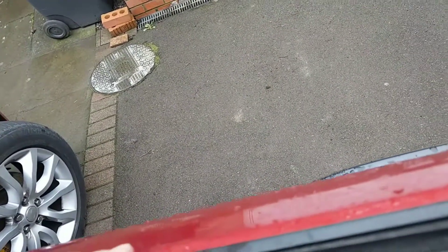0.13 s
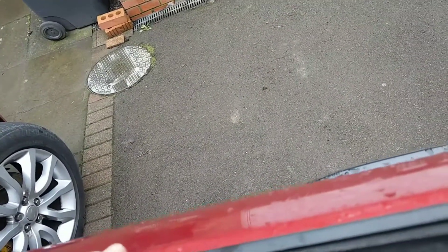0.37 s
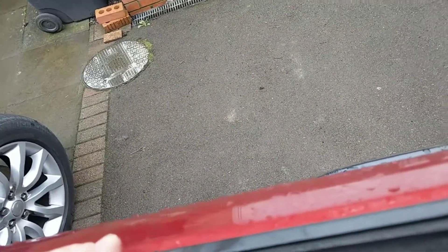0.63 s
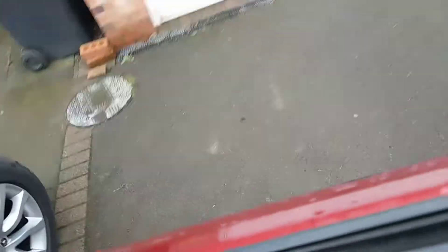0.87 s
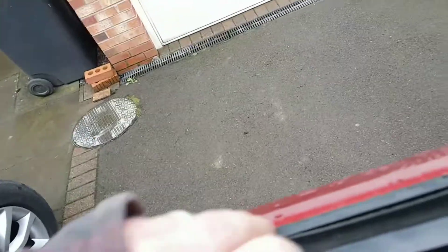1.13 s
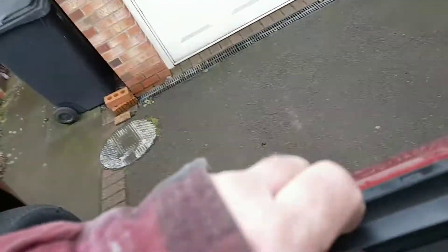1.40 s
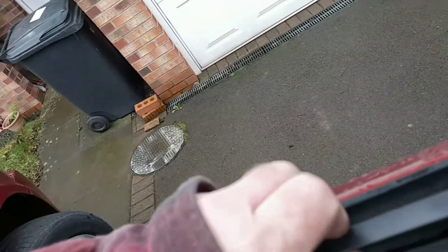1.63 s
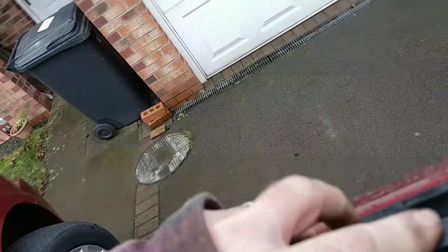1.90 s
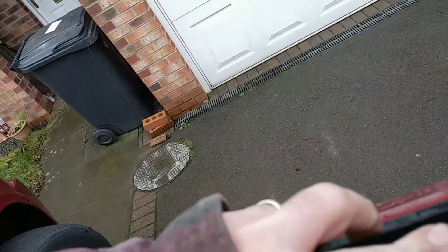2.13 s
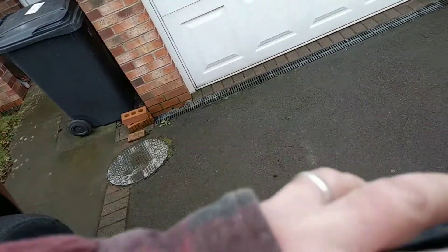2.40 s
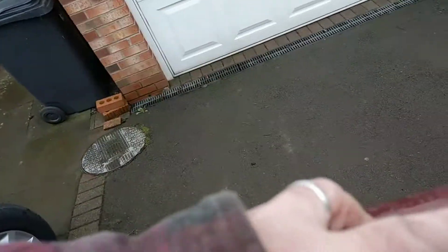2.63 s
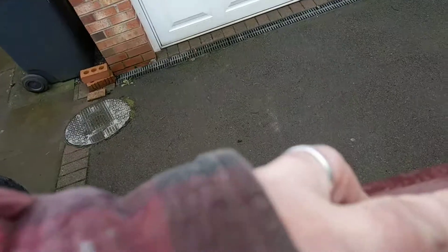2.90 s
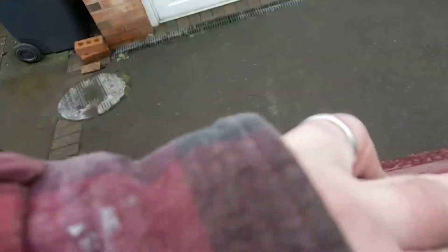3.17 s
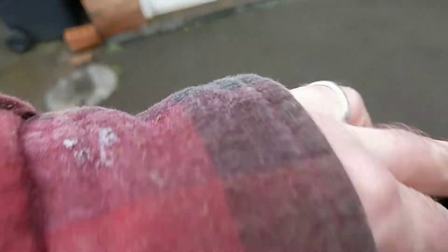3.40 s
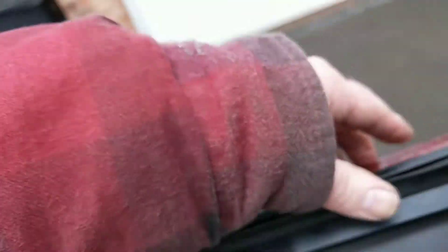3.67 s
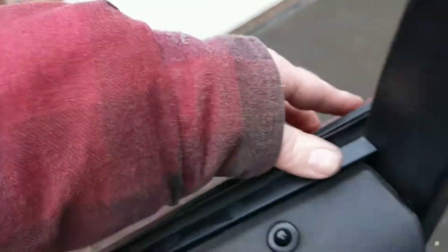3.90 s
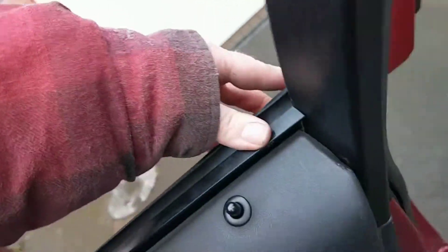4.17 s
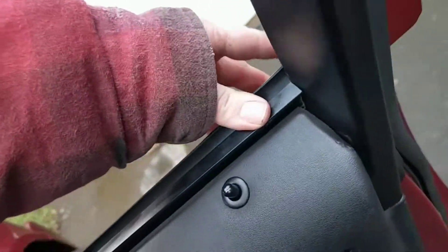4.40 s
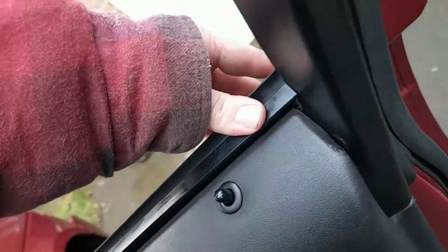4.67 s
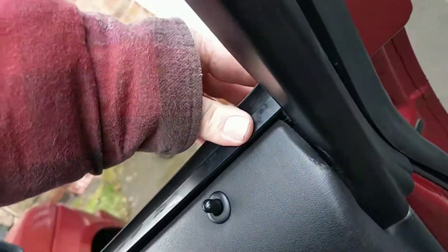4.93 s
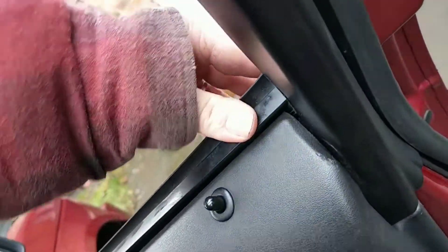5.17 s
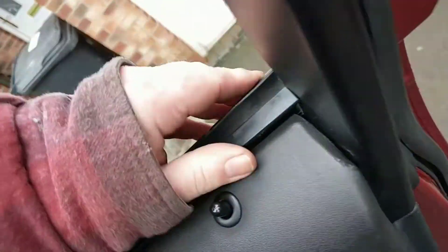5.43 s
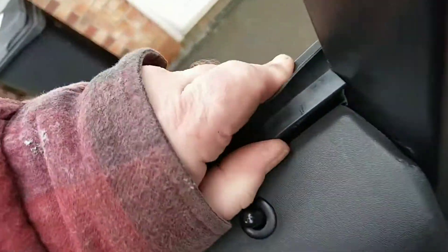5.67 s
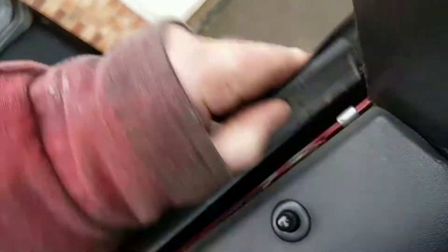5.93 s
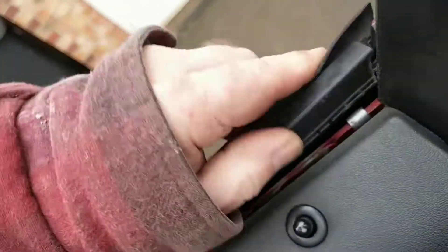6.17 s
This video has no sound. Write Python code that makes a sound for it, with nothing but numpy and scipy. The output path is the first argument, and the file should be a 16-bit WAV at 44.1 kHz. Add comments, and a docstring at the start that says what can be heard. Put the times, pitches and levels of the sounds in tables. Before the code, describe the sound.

Hands fumble at a car door trim in breezy open air, ticking and rubbing faintly until the strip snaps loose with a loud crack and scrape.

```python
"""Trim strip prised off a car door

Hands prise a plastic strip off a door on an open driveway, close to a two-port microphone.
Clips tick (filtered noise bursts) and thump the door (pushed resonances); hand and sleeve rub (shaped noise).
Low bursts of wind and door rumble (noise) reach the ports over steady hiss, an open-air wash, hum and whistle.
At last the strip snaps free: a burst of cracks, a ringing door cavity (decaying sines), a scrape."""
import sys
import numpy as np
from scipy import signal
from scipy.io import wavfile
from scipy.ndimage import uniform_filter1d

SR = 44100
rng = np.random.default_rng(int(sys.argv[2]) if len(sys.argv) > 2 else 0)


def attenuation_scalar(level_db):
    """Turn a level in dB into a linear amplitude multiplier (20 dB per decade)."""
    decades = np.asarray(level_db, float) / 20
    return 10 ** decades


def dump(signal):
    """Clip the signal to [-1, 1] and save it as 16-bit WAV at the path in sys.argv[1]."""
    limited = np.clip(np.atleast_2d(signal).T, -1, 1)
    pcm = np.round(limited * 32767).astype(np.int16)
    wavfile.write(sys.argv[1], SR, pcm)


N = 277995
MAX_PORT_LAG_SAMPLES = 17


def read(points, hz):
    """Value of a table on a log-frequency axis."""
    f, value = np.transpose(points)
    return np.interp(np.log(hz + 1), np.log(f + 1), value)


def sides(pan_db):
    """Left and right gains of constant total power."""
    gains = attenuation_scalar(np.multiply.outer([0.5, -0.5], pan_db))
    return gains * np.sqrt(2 / (gains ** 2).sum(0))


def add(mix, s, sound):
    """Mixes a stereo sound in at time s."""
    part = mix[:, round(s * SR):][:, :sound.shape[1]]
    part += sound[:, :part.shape[1]]


def swell(t, centre_s, half_s):
    """Bell-shaped rise and fall."""
    return np.exp(-((t - centre_s) / half_s) ** 2)


def wander(size):
    """Random drift of standard deviation 1, smoothed twice over size samples."""
    x = uniform_filter1d(rng.standard_normal(N), size=size)
    x = uniform_filter1d(x, size=size)
    return x / x.std()


def noise(colour_db, same, band_hz, patchy_db, size):
    """Two-channel noise: colour_db(hz, t) sets the spectrum, scaled to rms 1 in band; same(hz) the likeness."""
    hop = size // 4
    frames = N // hop + 5
    hz = np.fft.rfftfreq(size, 1 / SR)[:, None]
    a, b, c, d, patches = rng.standard_normal((frames, len(hz), 5)).T
    patches = uniform_filter1d(patches, size=size // 64, axis=0)
    patches = uniform_filter1d(patches, size=8, axis=1)
    shape = attenuation_scalar(colour_db(hz, np.arange(frames) * hop / SR) + np.zeros(frames))
    in_band = (hz > band_hz[0]) & (hz < band_hz[1])
    shape = shape / np.sqrt((shape ** 2 * in_band).sum(0))
    shape = shape * attenuation_scalar(patchy_db * patches / patches.std())
    likeness = np.clip(same(hz), -1, 1)
    left = a + 1j * b
    right = likeness * left + np.sqrt(1 - likeness ** 2) * (c + 1j * d)
    z = np.array([left, right]) * shape
    return signal.istft(z, nperseg=size, noverlap=size - hop)[1][:, :N] * np.sqrt(3 / 2)


def causal(points, size=1024):
    """Minimum-phase impulse response of a spectrum."""
    log_gain = np.log(attenuation_scalar(read(points, abs(np.fft.fftfreq(size, 1 / SR)))))
    return np.fft.ifft(np.exp(np.conj(signal.hilbert(log_gain)))).real[:size // 2]


def body(modes, t, spot_hz, reach_db):
    """Damped resonances; each loses reach_db per octave from the pitch of the struck spot."""
    hz, width_hz, db = np.transpose(modes)[:, :, None]
    db = db - reach_db * abs(np.log2(hz / spot_hz))
    return (attenuation_scalar(db) * np.exp(-np.pi * width_hz * t) * np.sin(2 * np.pi * hz * t)).sum(0)


# clip ticks and cracks: (t/s, treble level/dB, strip level/dB, rattle t60/s, left-right/dB)
CLIP_TICKS = [(0.0231, -44, -59, 0.049, -1.5), (.4355, -41.5, -57, 0.014, 5.5), (0.561, -47, -61, 0.029, 4),
              (0.8192, -52, -64, 0.013, -1), (0.8744, -39.5, -59, 0.011, 1.5),
              (0.8901, -35.5, -52.5, .011, 3.5), (1.393, -33, -60.5, 0.019, -2),
              (1.5944, -40, -52, 0.024, -3.5), (1.804, -40, -58, 0.018, 2.5),
              (1.935, -47.5, -70, 0.018, 11), (1.9595, -38.5, -52, 0.0092, -3),
              (2.1516, -59, -62.5, .015, 7), (2.4032, -41, -57, 0.031, -5),
              (2.527, -29, -37.5, 0.017, -8.5), (2.5346, -37, -69, 0.017, -6.5),
              (2.551, -47, -49.5, 0.01, -6.5), (2.6505, -74, -43, 0.031, -4),
              (2.903, -40.5, -64, 0.018, -5), (2.9751, -49, -69, 0.034, 1.5),
              (3.138, -37, -43.5, 0.044, -7), (3.177, -41.5, -58.5, 0.017, 3),
              (3.5394, -33.5, -50.5, 0.018, -13), (3.5661, -62, -39, 0.011, -12),
              (3.5768, -45.5, -53.5, 0.026, 8), (3.7638, -44.5, -60.5, 0.024, 3.5),
              (3.891, -49, -70, 0.03, -.5), (3.993, -50.5, -68, 0.03, 7), (5.5888, -45, -53, 0.063, 1),
              (5.8898, -38.5, -64, 0.014, 3), (5.974, -23, -33.5, 0.068, -1),
              (5.9831, -43, -26.5, 0.029, 3.5), (5.9862, -12.5, -22.5, 0.032, -4),
              (5.9921, -11, -61, 0.016, 5.5), (5.9954, -18, -26.5, 0.058, 4),
              (6.0045, -22.5, -58, 0.07, -1.5), (6.0266, -33, -46.5, .018, 5), (6.0806, -37, -49, 0.02, 7),
              (6.0924, -35, -48, 0.021, 7), (6.125, -19, -37, 0.011, -0.5),
              (6.1302, -27.5, -34.5, 0.05, 4.5), (6.1361, -34, -44, .029, -8),
              (6.1597, -34.5, -54, .03, -2.5)]
# treble spectrum of a tick: (f/Hz, relative level/dB)
TICK_TREBLE = [(1200, -31), (2400, 0), (3600, 1.5), (5000, 1.5), (6400, 0), (7300, 4), (8300, -6),
               (9200, -11), (10200, -25.5), (13000, -24.5), (15500, -32), (17000, -48)]
# plastic strip resonances: (f/Hz, width/Hz, relative level/dB)
STRIP_MODES = [(750, 210, 25), (1420, 580, 14), (1850, 720, 31), (2740, 500, 26.5), (4470, 490, 9.5)]
# ticks whose treble stands out by more than BRIGHT_DB strike a higher spot of the strip
SPOT_HZ, SPOT_OCT_PER_DB, BRIGHT_DB = 1840, 0.9, 14.5


def ticks():
    """Each tick is a sharp slip with a rattling tail that excites treble and strip."""
    out = np.zeros((2, N))
    t = np.arange(4000) / SR
    crack = causal(TICK_TREBLE)
    # a thin strip radiates no bass, soft contact no top treble
    soft = signal.butter(2, (650, 7000), "band", fs=SR, output="sos")
    for s, treble_db, strip_db, t60_s, pan_db in CLIP_TICKS:
        spot_hz = SPOT_HZ * 2 ** (SPOT_OCT_PER_DB * max(treble_db - strip_db - BRIGHT_DB, 0))
        rattle = rng.standard_normal((3, len(t))) * attenuation_scalar(-60 * t / max(t60_s, 0.004))
        rattle *= np.minimum(t / 0.00071, 1)
        rattle = 0.7 * rattle[0] + 0.7 * rattle[1:]  # ports hear partly different reflections
        rattle[:, 0] -= 5.5  # the slip
        treble = signal.fftconvolve(rattle, crack[None])[:, :len(t)]
        treble = treble / np.sqrt(2 * uniform_filter1d((treble ** 2).mean(0), size=40).max())
        strip = signal.fftconvolve(rattle, body(STRIP_MODES, t, spot_hz, reach_db=6)[None])[:, :len(t)]
        strip = signal.sosfilt(soft, strip)
        strip /= strip[:, :SR // 60].std()
        sound = (attenuation_scalar(treble_db) * treble + attenuation_scalar(strip_db) * strip) * sides(pan_db)[:, None]
        # the shaded port hears it later
        late = round(np.clip(-2 * pan_db, -MAX_PORT_LAG_SAMPLES, MAX_PORT_LAG_SAMPLES))
        sound[0] = np.roll(sound[0], max(late, 0))
        sound[1] = np.roll(sound[1], max(-late, 0))
        add(out, s, sound)
    return out


def yard(x):
    """Short sparse echoes off the door, the ground and the nearby walls: random signed taps, t60 0.23 s."""
    taps = np.zeros((2, 8000))
    at = np.arange(100, 7960, 20) + rng.integers(0, 20, (2, 393))
    np.put_along_axis(taps, at, rng.choice([-1., 1.], at.shape), 1)
    taps *= attenuation_scalar(-60 * np.arange(8000) / SR / 0.23)
    return signal.fftconvolve(x, taps / np.linalg.norm(taps[0]), axes=1)[:, :N]


# door cavity modes: (f/Hz, relative level/dB, t60/s)
CAVITY_MODES = [(1157, 0, .06), (1160, -22, .16), (721, -27, .12), (1552, -32, .1), (2321, -32, .12),
                (3500, -26, .025), (4618, -30, .14), (1232, -24, .06)]
# blows to the cavity: (t/s, level/dB, time kept shaking/s, left-right/dB)
CAVITY_BLOWS = [(5.993, -10.5, 0.032, 7), (6.148, -44, 0.0062, 9), (6.168, -40, 0.0088, 9)]


def ring():
    """The freed strip keeps shaking the door cavity for a moment before its ring dies away."""
    out = np.zeros((2, N))
    t = np.arange(12000) / SR
    hz, mode_db, t60_s = np.transpose(CAVITY_MODES)[:, :, None]
    for s, db, shaken_s, pan_db in CAVITY_BLOWS:
        dying_s = np.hypot(t, shaken_s) - shaken_s
        tones = (attenuation_scalar(mode_db - 60 * dying_s / t60_s) * np.sin(2 * np.pi * hz * t)).sum(0)
        add(out, s, attenuation_scalar(db) * np.minimum(t / 0.0071, 1) * tones * sides(pan_db)[:, None])
    return out


# thumps through the door: (t/s, peak level before panning/dB, pitch of the struck spot f/Hz)
DOOR_THUMPS = [(.432, -43.5, 318), (0.554, -44, 153), (0.889, -40, 156), (1.96, -32, 245),
               (2.527, -28.5, 132), (2.553, -39, 81), (2.647, -44, 307), (3.14, -33, 100),
               (3.177, -37, 145), (3.579, -30.5, 81), (3.763, -42.5, 135), (5.591, -33.5, 174),
               (5.6, -31.5, 342), (5.973, -24.5, 700), (5.984, -24, 140), (5.991, -20.5, 191),
               (5.997, -18, 345), (6.025, -24.5, 132), (6.043, -24, 124), (6.082, -30, 127),
               (6.135, -25, 312), (6.221, -33.5, 81)]
# door skin resonances: (f/Hz, width/Hz, relative level/dB)
DOOR_MODES = [(71, 22, -2), (147, 17, -1), (200.8, 21.5, 1.5), (246.5, 17.4, 0.5), (333.6, 44, 7.5),
              (707, 47, 2.5)]
PUSH_DECAY_S = 0.0011


def thumps():
    """Soft pushes of a few milliseconds ring the door skin, one waveform in both ports."""
    out = np.zeros((2, N))
    t = np.arange(8000) / SR
    for s, db, spot_hz in DOOR_THUMPS:
        shove = rng.standard_normal(len(t)) * np.exp(-t / PUSH_DECAY_S)
        shove[:40] += 2.5 * np.hanning(40)
        shove = np.convolve(shove, np.hanning(12))  # rounded by the padding of the fingers
        thump = signal.fftconvolve(body(DOOR_MODES, t, spot_hz, reach_db=14.5), shove)[:len(t)]
        add(out, s, attenuation_scalar(db) * thump / np.abs(thump).max() * sides(3.4)[:, None])
    return out


# strokes of hand and sleeve: (centre t/s, half length/s, hiss level/dB, rasp level/dB, drag level/dB)
HAND_STROKES = [(0.012, 0.027, -66, -63, -68), (0.49, 0.08, -67, -68.5, -68.5), (0.628, .06, -70, -69, -73),
                (0.802, 0.031, -66, -68, -68), (0.9, 0.089, -65.5, -65.5, -68),
                (1.017, 0.08, -57.5, -65.5, -59), (1.14, 0.095, -59.5, -66.5, -79),
                (1.338, 0.073, -64.5, -66, -64), (1.467, 0.035, -64, -72, -66),
                (1.62, 0.043, -65.5, -67, -60), (1.788, .014, -57.5, -69, -65),
                (1.933, 0.0085, -45, -67, -70), (2.31, 0.068, -68.5, -68, -71),
                (2.441, 0.047, -61.5, -61, -59.5), (2.61, 0.059, -66, -64, -61.5),
                (2.744, 0.09, -71, -66.5, -68.5), (2.85, 0.044, -68, -69, -74),
                (2.978, 0.021, -64.5, -66, -61.5), (3.144, .045, -65, -60.5, -61),
                (3.535, 0.049, -61.5, -63.5, -63.5), (3.782, 0.027, -71, -72, -62.5),
                (5.33, 0.04, -62.5, -66.5, -64.5), (5.456, 0.045, -60.5, -62.5, -57),
                (5.51, .015, -64.5, -61, -54), (5.574, 0.11, -68, -66.5, -55),
                (5.702, 0.051, -68, -71, -66), (6.038, 0.048, -64, -70, -45),
                (6.147, 0.043, -72, -64, -53.5), (6.248, 0.066, -67.5, -65, -65)]
# where the hands are: (t/s, left-right/dB)
HAND_PATH = [(0, 0), (.8, -0.5), (1.3, -3), (1.5, 4), (1.9, -1), (2.4, -6), (2.8, -4), (3.55, -8), (3.8, 0),
             (5.5, 2), (6.05, 0), (6.3, 12)]
# spectra of hiss, rasp, drag and scrape: (f/Hz, relative level/dB)
HISS_COLOUR = [(1500, -25), (3500, -22.5), (5000, -11), (6300, -6.5), (7300, -2.5), (8300, -7.5),
               (9200, -16), (10500, -23), (12500, -43.5), (15500, -30)]
RASP_COLOUR = [(600, -17), (1200, 5.5), (1900, 0.5), (3200, -2), (4500, -4.5), (6000, -23)]
DRAG_COLOUR = [(120, -15), (250, 9), (450, 3.5), (800, -6.5), (1300, -17), (2500, -62)]
SCRAPE_SPECTRUM = [(530, -48), (900, 1), (1010, -27), (1290, -10), (2250, -4), (2850, -5), (3150, -35),
                   (4590, -12.5), (5300, -25), (6870, -15.5), (9000, -24.5), (11700, -55), (19800, -120)]
# steady background hiss, rasp and low murmur under the strokes, level drifting at random
STEADY_HISS_DB, STEADY_RASP_DB, STEADY_MURMUR_DB, DRIFT_DB = -71.5, -71.5, -72, 1.48
# final scrape, louder by ONSET_DB at first
SCRAPE_S, SCRAPE_DB, ONSET_DB, ONSET_DECAY_S, SCRAPE_FADE_DB_PER_S = 6.01, -52, 7, 0.015, 17


def rubbing():
    """Hiss, rasp and door drag of hand strokes over a steady background; freed strip scrapes its channel."""
    t = np.arange(N) / SR
    drift = attenuation_scalar(DRIFT_DB * wander(size=1800)) ** 2 * np.ones((2, 1))
    hiss_power = attenuation_scalar(STEADY_HISS_DB) ** 2 * drift
    rasp_power = attenuation_scalar(STEADY_RASP_DB) ** 2 * drift
    low_power = attenuation_scalar(STEADY_MURMUR_DB) ** 2 * drift
    for s, half_s, hiss_db, rasp_db, drag_db in HAND_STROKES:
        shape = swell(t, s, half_s) ** 2
        place = sides(np.interp(s, *np.transpose(HAND_PATH)))[:, None] ** 2
        hiss_power += attenuation_scalar(hiss_db) ** 2 * shape * place
        rasp_power += attenuation_scalar(rasp_db) ** 2 * shape * place
        low_power += attenuation_scalar(drag_db) ** 2 * shape
    # stick-slip flicker
    grain = attenuation_scalar(1.5 * uniform_filter1d(rng.standard_normal(N), size=100) * 10)
    hiss = noise(lambda hz, s: read(HISS_COLOUR, hz), lambda hz: 0.028 + 0 * hz,
                 (5500, 9000), patchy_db=0.0, size=256)
    rasp = noise(lambda hz, s: read(RASP_COLOUR, hz), lambda hz: 0.033 + 0 * hz,
                 (1200, 4000), patchy_db=0.5, size=256)
    low = noise(lambda hz, s: read(DRAG_COLOUR, hz), lambda hz: 0.85 + 0 * hz,
                (250, 900), patchy_db=1.5, size=1024)
    scrape = noise(lambda hz, s: read(SCRAPE_SPECTRUM, hz), lambda hz: 0.5 + 0 * hz,
                   (1500, 3000), patchy_db=0.8, size=256)
    since_s = np.maximum(t - SCRAPE_S, 0)
    scrape_db = SCRAPE_DB + ONSET_DB * np.exp(-since_s / ONSET_DECAY_S) - SCRAPE_FADE_DB_PER_S * since_s
    scrape *= attenuation_scalar(scrape_db + 1.3 * wander(size=60)) * (since_s > 0) * sides(5.8)[:, None]
    grainy = grain * (np.sqrt(hiss_power) * hiss + np.sqrt(rasp_power) * rasp + scrape)
    return grainy + np.sqrt(low_power) * low


# low bursts at the ports: wind gusts, and the low rumble of door thumps near 2.53, 3.58 and 6.02 s:
# (centre t/s, half length/s, level/dB, left-right/dB)
LOW_BURSTS = [(0.023, 0.035, -43, 11), (0.164, 0.026, -44.5, -19), (0.291, 0.066, -44.5, -28),
              (0.885, 0.019, -65, -7), (1.534, 0.028, -47, 17), (1.654, 0.026, -52, -6),
              (1.972, 0.027, -45.5, -10), (2.122, 0.019, -43, 21), (2.295, 0.064, -44.5, 5.5),
              (2.533, 0.05, -41, 1), (2.702, 0.047, -44, 14), (2.84, 0.1, -59, 17), (3.138, 0.023, -46, 2),
              (3.272, 0.039, -41, 26), (3.365, 0.076, -43.5, 31), (3.511, 0.043, -42.5, 24),
              (3.582, 0.046, -37, 10), (4.013, 0.041, -51, 4), (4.385, 0.12, -52, 19),
              (4.627, 0.037, -43.5, -24), (4.797, 0.034, -31, -18), (4.843, 0.026, -31.5, -23),
              (5.025, 0.19, -44.5, -6), (5.199, 0.051, -43, 14), (5.294, 0.075, -42.5, -9),
              (5.402, 0.04, -40.5, 16), (5.53, 0.023, -41.5, 19), (5.65, 0.099, -50, 11),
              (6.015, 0.033, -36, 2), (6.199, 0.064, -41.5, -2)]
# spectrum of a burst at -45 dB: (f/Hz, relative level/dB)
BUFFET_COLOUR = [(20, -27), (32, -12), (45, 10), (65, 2.5), (110, -4), (200, -24), (400, -43.5), (800, -85)]
BREEZE_DB, LUMPS_DB = -58, 3  # air between bursts, standard deviation of its level


def wind_and_rumble():
    """Lumpy low noise of wind and door rumble, nearly unrelated per port; stronger bursts reach higher."""
    t = np.arange(N) / SR
    lumps = np.array([wander(size=2500), wander(size=2500)])
    power = attenuation_scalar(BREEZE_DB + LUMPS_DB * lumps) ** 2
    for s, half_s, db, pan_db in LOW_BURSTS:
        power += (attenuation_scalar(db) * swell(t, s, half_s) * sides(pan_db)[:, None]) ** 2

    def reach(s):
        level_db = 10 * np.log10(np.interp(s, t, power.mean(0)))
        return attenuation_scalar(0.46 * (level_db + 45))

    buffet = noise(lambda hz, s: read(BUFFET_COLOUR, hz / reach(s)), lambda hz: -0.1 + 0 * hz,
                   (25, 200), patchy_db=3.0, size=1024)
    return buffet * np.sqrt(power)


# open-air spectrum: (f/Hz, relative level/dB)
AIR_COLOUR = [(35, -35), (60, -15.5), (115, 0), (206, -8.5), (238, -8.5), (322, -20.5), (397, -19),
              (456, -24), (501, -17.5), (550, -28), (711, -13.5), (3990, -35.5), (7490, -33.5),
              (11100, -48.5), (15800, -69)]
# likeness of the ports: (f/Hz, left-right correlation)
PORT_LIKENESS = [(60, 1), (150, 1), (400, 0.47), (1000, 0.5), (2400, 0.076), (6000, 0.14)]
# thin high whistle: (start t/s, end t/s, f/Hz, mean level/dB)
HIGH_WHISTLE = (2.55, 3.14, 7214, -77)
AIR_DB, HUM_HZ, HUM_MEAN_DB = -66, 497, -72.5


def air():
    """Open-air wash of distant traffic and leaves as noise, with a faint wavering hum and whistle as sines."""
    t = np.arange(N) / SR
    wash = noise(lambda hz, s: read(AIR_COLOUR, hz), lambda hz: read(PORT_LIKENESS, hz),
                 (300, 15000), patchy_db=1.05, size=1024)
    waver = uniform_filter1d(rng.standard_normal(N), 4000) * 60
    start_s, end_s, hz, db = HIGH_WHISTLE
    lasting = np.clip(np.minimum(t - start_s, end_s - t) / 0.12, 0, 1)
    whistle = attenuation_scalar(db + 3.1 * waver[::-1]) * lasting * np.sin(2 * np.pi * hz * t)
    hum = attenuation_scalar(HUM_MEAN_DB + 1.4 * waver) * np.sin(2 * np.pi * HUM_HZ * t)
    return whistle + attenuation_scalar(AIR_DB) * wash + hum


def scene():
    """Sum of all sources; the open-air wash comes from the right, so the left port lags."""
    hits, wash = ticks(), air()
    wash[0] = np.roll(wash[0], MAX_PORT_LAG_SAMPLES)
    return hits + attenuation_scalar(-19.5) * yard(hits) + thumps() + ring() + rubbing() + wash + wind_and_rumble()


def top_cut(x):
    """Nothing passes above the cut-off."""
    return signal.sosfilt(signal.butter(12, 15800, fs=SR, output="sos"), x)


def record(dry):
    """The microphone's bass cut: second-order high-pass at 36 Hz."""
    mix = signal.sosfilt(signal.butter(2, 36, "high", fs=SR, output="sos"), dry)
    return top_cut(mix)


dry = scene()
out = record(dry)
dump(out)
```